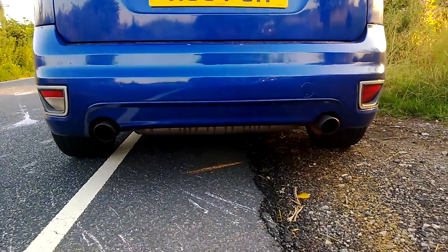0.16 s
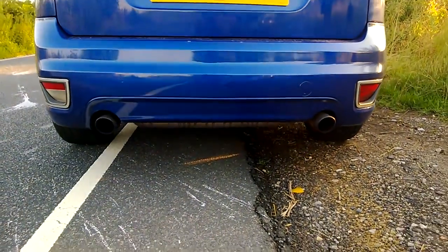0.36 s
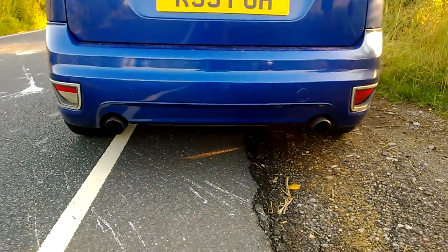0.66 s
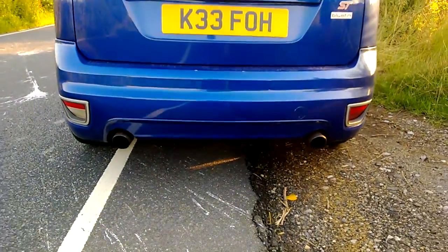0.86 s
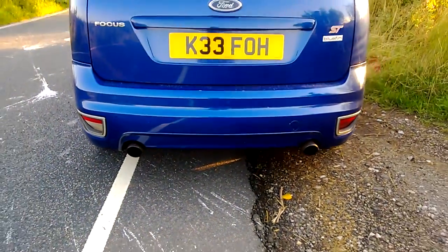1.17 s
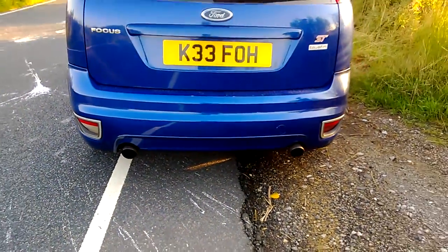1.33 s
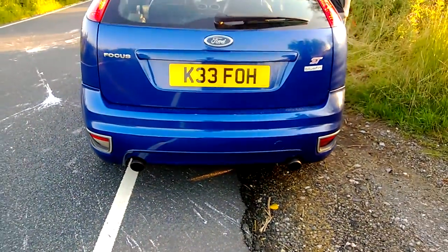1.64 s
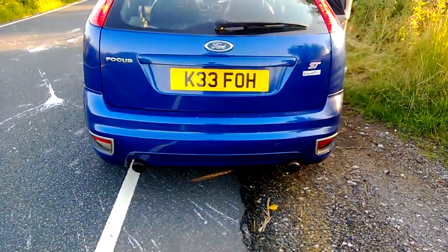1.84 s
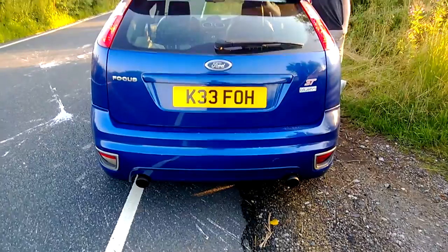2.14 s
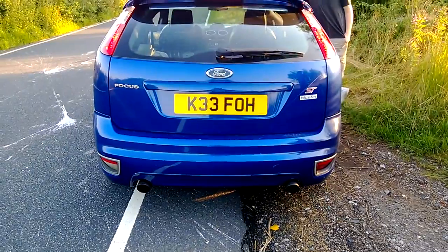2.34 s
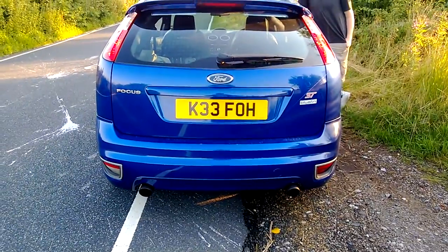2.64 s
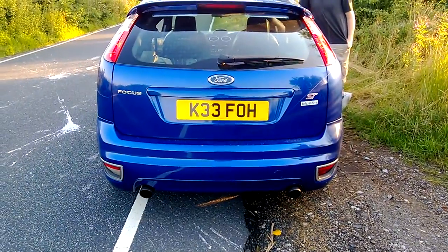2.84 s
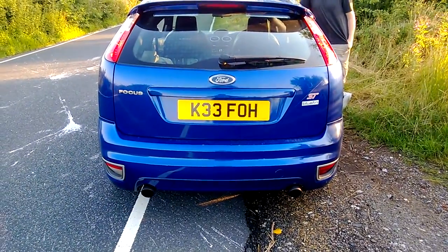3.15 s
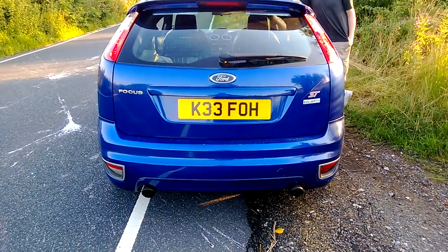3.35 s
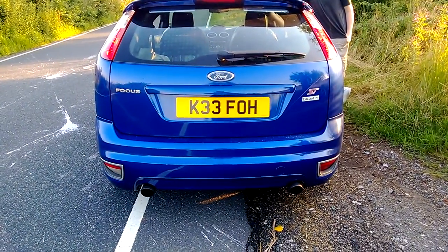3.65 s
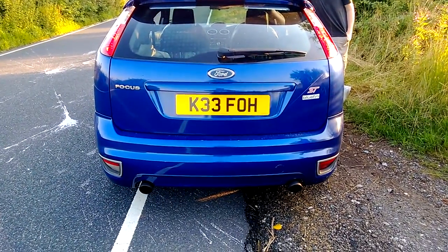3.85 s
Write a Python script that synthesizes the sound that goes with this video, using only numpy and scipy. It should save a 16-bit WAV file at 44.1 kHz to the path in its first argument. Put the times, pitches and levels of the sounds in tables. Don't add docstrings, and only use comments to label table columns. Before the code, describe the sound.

Close behind a car's tailpipes on an open roadside, the engine runs down with dense popping and hissing spits, the microphone backs away, idle settles softly, and a fresh rev rises at the end.

```python
import sys
import numpy as np
from scipy import signal
from scipy.fft import rfft, irfft
from scipy.io import wavfile
from scipy.ndimage import uniform_filter1d

SR = 44100
rng = np.random.default_rng(int(sys.argv[2]) if len(sys.argv) > 2 else 0)


def pcm_store(signal):
    levels = np.round(np.clip(np.atleast_2d(signal), -1, 1) * 32767)
    wavfile.write(sys.argv[1], SR, levels.astype(np.int16).T)


def gain_from_db(level_db):
    decades = np.asarray(level_db, float) / 20
    return 10 ** decades


N = 176400
TIME = np.arange(N) / SR

# time in seconds, firing rate in Hz, level in dB, overtone gain in dB.
FIRING_NOTE = [(0, 173.5, -38, -4.5), (.22, 164.1, -25, -0.5), (.29, 161.4, -40, -3),
               (.35, 157.9, -40.5, -7), (.4, 155.4, -25.5, -9.5), (.89, 130.7, -30.5, -1.5),
               (1.3, 116.6, -41, -6.5), (2.4, 66.27, -40.5, -10), (2.68, 58, -33.5, -6.5),
               (2.94, 50.11, -27.5, -13.5), (3.25, 44.79, -42, -5.5), (3.55, 41.9, -44, -5),
               (3.745, 50.72, -23.5, -11.5), (3.83, 57.75, -19.5, -5), (3.92, 68.7, -21, 5),
               (4, 69.2, -21, 5.5)]
# frequency in Hz, level in dB.
OVERTONES = [(85, -23.5), (138, -14), (200, -35), (270, -23), (330, -38), (400, -42.5), (510, -32),
             (700, -68)]
# multiple of a fifth of the firing rate, level in dB.
FIFTHS = [(2, -3.5), (4, -15.5), (8, -16), (12, -24.5), (14, -16.5), (15, -15), (22, -19), (30, -14)]
IMBALANCE_HZ, IMBALANCE_DB_PER_OCT, FIFTHS_FOLLOW = 174, 13.5, 0.2
FUEL_CUT_S, FUEL_CUT_DB = 0.39, -14.5

# start in seconds, length in
# seconds, level in dB, pitch in Hz.
BOOMS = [(0.223, 0.1, -24, 61.7), (0.37, 0.068, -24, 48.5), (0.473, 0.034, -27.5, 47),
         (0.527, 0.054, -22.5, 65), (0.595, 0.014, -19.5, 47), (0.619, 0.15, -21.5, 62.84),
         (0.796, 0.13, -22.5, 60.3), (0.951, 0.041, -37.5, 71), (0.974, 0.048, -28, 67),
         (1.042, 0.051, -25.5, 70.6), (1.137, 0.061, -30, 50.7), (1.205, 0.074, -29.5, 48.2),
         (1.305, 0.12, -27, 55.1), (1.527, 0.13, -24.5, 54), (1.677, 0.12, -25, 50.7),
         (1.752, 0.056, -18.5, 51), (1.883, 0.018, -20.5, 55.9), (1.939, 0.073, -25.5, 56.7),
         (1.989, 0.02, -17, 49.7), (2.064, 0.048, -22, 56.6), (2.14, 0.25, -23, 54.5),
         (2.427, 0.089, -24.5, 62.9), (2.555, 0.097, -28.5, 52.6),
         (1.399, 0.11, -19.5, 56.8),
    (3.362, 0.067, -45, 40.8),
    (3.46, 0.058, -42, 39.3),
]
BOOM_EDGE_S, BOOM_WOBBLE, BOOM_LUMPS_DB = 0.019, 0.041, 3.5

# time in seconds, uneven burning in dB, rasp in dB, jet hiss in dB.
GAS_FLOW = [(0, -41.5, -41.5, -61), (.08, -53.5, -42.5, -60.5), (.2, -44.5, -41.5, -62),
            (.3, -47, -48.5, -62.5), (.43, -40.5, -42, -64), (.6, -41.5, -42.5, -63.5),
            (1, -41.5, -47.5, -69), (1.2, -49.5, -48.5, -69.5), (1.45, -50.5, -48, -73.5),
            (1.7, -45.5, -52, -81.5), (1.9, -48, -51.5, -86.5), (2.25, -49, -57.5, -87.5),
            (2.55, -49, -61.5, -94.5), (2.75, -59, -70, -98), (3.5, -83, -83.5, -99),
            (3.75, -59, -55.5, -86), (3.92, -47, -46, -75), (4, -54, -44, -68.5)]
GATE, UNEVEN_DB = 0.28, 1.5
CREST_DB, STEEPEN = 1.5, 0.15
REV_S, REV_DIP_DB, TIP_REV_DB = 3.6, -5.5, 0.5
KNOCK_STEADY, KNOCK_BURST_DB = 0.9, 27
# middle in seconds, half length in seconds, gain in dB.
GUSTS = [(0.492, .015, -2), (0.602, .015, 0), (0.722, .02, 2.5), (.885, .015, 4), (1.068, .02, 2.5),
         (1.323, .015, 7.5), (1.465, .018, 6.5), (1.547, .03, 5), (1.61, .018, 9), (1.716, .02, 11),
         (1.77, .025, 9), (1.87, .035, 4), (2.09, .018, 8), (2.193, .015, 9), (2.255, .03, 11.5),
         (2.57, .012, 7), (2.61, 0.023, 14.5), (3.85, .03, 7.5), (3.938, .025, 9.5)]
# frequency in Hz, level in dB per Hz.
JET_COLOUR = [(4000, -13), (4800, -4), (6000, -6.5), (8500, -3.5), (9800, -6), (11000, -3.5), (13000, -12),
              (15700, -19)]
JET_TOP_HZ, JET_TOP_FOLLOWS = 9800, 1

# time in seconds, peak in dB, bright part in dB, T60 in seconds.
POPS = [(0.363, -31.5, -20, 0.2), (0.397, -28, -20, 0.38), (0.486, -23.5, -10.5, 0.15),
        (0.592, -22, -11, 0.073), (0.653, -21, -46, 0.074), (0.714, -23, -57, 0.4), (0.861, -42.5, -6, 0.2),
        (0.893, -22.5, -60, 0.054), (0.934, -26, -43, 0.12), (0.997, -20, -22.5, 0.022),
        (1.047, -33, -24, 0.45), (1.137, -24.5, -50, 0.11), (1.205, -24.5, -39, 0.13),
        (1.313, -22, -26, 0.15), (1.406, -30, -20, 0.16), (1.461, -24, -21.5, 0.091),
        (1.589, -29, -22.5, 0.22), (1.706, -31.5, -22, 0.18), (1.792, -36, -51, 0.15),
        (1.946, -34, -42, 0.18), (2.068, -29.5, -64, 0.11), (2.14, -37.5, -42, 0.24),
        (2.225, -34.5, -27.5, 0.14), (2.366, -34, -43, 0.29), (2.555, -35, -29, 0.27),
        (3.916, -32, -24.5, 0.14)]
POP_SOFT_HZ, POP_SNAP_DB, POP_THUD_DB, POP_BRIGHT_SHARE = 2500, 4.5, 18.5, 0.39
# time in seconds, peak in dB.
CRACKLES = [(0.524, -28), (0.641, -28.5), (0.7, -22), (0.795, -35), (0.863, -30), (0.948, -23),
            (0.973, -29), (1.007, -35), (1.055, -34), (1.074, -25), (1.119, -25.5), (1.189, -31),
            (1.224, -41), (1.259, -37), (1.348, -34), (1.385, -34), (1.443, -19.5), (1.544, -36),
            (1.572, -42.5), (1.684, -28.5), (1.749, -28), (1.769, -30.5), (1.864, -36), (1.954, -36.5),
            (1.979, -41.5), (2.183, -34.5), (2.269, -39.5), (2.389, -40.5), (2.505, -39.5), (2.616, -47)]
CRACKLE_T60_S, CRACKLE_SNAP_DB, CRACKLE_BODY_DB = 0.055, 0.5, -15.5

# frequency in Hz, width in Hz, level in dB.
PIPE_THUD = [(58, 17, -2.5), (103.2, 18.7, 3.5), (146.1, 20.8, 8), (259.5, 16, 3.5), (358.3, 19.6, 4),
             (387.8, 33.5, -0.5), (472, 32.7, -4.5)]
# frequency in Hz, width in Hz, level near in dB, gain further away in dB.
PIPE_KNOCK = [(101.5, 12, 10, 4.5), (143.3, 18.9, 16, -1.5), (257.1, 18, 5.5, 4), (360.2, 15.4, 4, 5),
              (391, 22.8, 9.5, -13), (479.3, 35, -3.5, -5)]
# frequency in Hz, width in Hz, level near in dB, gain further away in dB.
TAILPIPE = [(586, 99, -16.5, 4), (734.1, 13.5, 1, -2.5), (873, 53, -19, 17.5), (959, 86.5, 2.5, -3.5),
            (1149, 143, -10, 1), (1289, 207, -3.5, -12), (1480, 120, -11.5, -5), (1812, 107, -15, 9),
            (2088, 130, -16.5, 0.5)]
# frequency in Hz, width in Hz, level near in dB, gain further away in dB.
TIP = [(3030, 296, -0.5, 7), (3337, 179, 3, -2.5), (3580, 327, 4, 1.5), (3834, 367, 5, -11.5),
       (4020, 280, -20.5, 11)]
TIP_DB = -18
# frequency in Hz, width in Hz, level in dB.
REV_RINGS = [(1710, 240, 5), (2317, 130, 1)]
# frequency in Hz, width in Hz, level in dB.
MAIN_CHAMBER = [(976, 51, 2), (1017, 88, -5.5)]
CHAMBER_DB, CHAMBER_SMALL_DB, CHAMBER_SOFT_S = 13.5, 4, 0.001
STEP_BACK_S, STEP_TAKES_S, PATCHY_DB = 1.153, 0.27, 2.0

TICK_S, TICK_SPREAD_S, TICK_PERIOD_S = 3.43, 0.09, 0.0245
TICK_HZ, TICK_SAG_HZ_PER_S, TICK_DB = 3610, 600, -74
END_CLICK_S, END_CLICK_DB = 3.9997, -27
# start in seconds, length in seconds, start pitch in Hz, end pitch in Hz, level in dB.
SQUEAKS = [
    (3.292, 0.071, 2450, 2570, -72),
    (3.31, 0.065, 2740, 2800, -80),
    (3.342, 0.07, 2270, 2500, -74),
]
# frequency in Hz, level in dB per Hz.
AIR_COLOUR = [(40, -4.5), (60, 1.5), (142, -10.5), (230, -25), (570, -33), (950, -28.5), (2300, -42.5),
              (5000, -62), (16000, -78)]
AIR_DB = -52


def rms_one(x):
    return x / np.sqrt(np.mean(x ** 2) + 1e-20)


def in_time(rows):
    s, *columns = np.transpose(rows)
    return [np.interp(TIME, s, c) for c in columns]


def drift(rate_hz):
    r = np.exp(-80 * np.pi * rate_hz / SR)
    chance = rng.standard_normal(N // 40 + 2002)
    slow = signal.lfilter([1], [1, -2 * r, r * r], chance)[2000:]
    return np.interp(np.arange(N) / 40, np.arange(len(slow)), rms_one(slow))


def coloured(spectrum):
    hz, db = np.transpose(spectrum)
    log_hz = np.log(np.arange(N // 2 + 1) * SR / N + 1)
    gain = gain_from_db(np.interp(log_hz, np.log(hz), db, left=-99, right=-99))
    return rms_one(irfft(rfft(rng.standard_normal(N)) * gain, N))


def resonate(x, table):
    out = 0
    for k, (hz, width_hz, db) in enumerate(table):
        r = np.exp(-np.pi * width_hz / SR)
        top = [(1 - r * r) / 2, 0, (r * r - 1) / 2]
        bottom = [1, -2 * r * np.cos(2 * np.pi * hz / SR), r * r]
        out = out + (-1) ** k * gain_from_db(db) * signal.lfilter(top, bottom, x + 1e-18)
    return out


def chambers(x, table, patchy_db):
    away = 0.5 + 0.5 * np.tanh((TIME - STEP_BACK_S) / STEP_TAKES_S)
    out = 0
    for hz, width_hz, db, far_db in table:
        gain = gain_from_db(db + far_db * away + patchy_db * drift(5.8))
        once = resonate(x, [(hz, width_hz, 0)])
        out = out + gain * resonate(once, [(hz, 2 * width_hz, 0)])
    return out


def dying(s, db, t60):
    clicks, envelope, t = np.zeros(N), np.zeros(N), np.arange(SR // 3) / SR
    starts = (s * SR).astype(int)
    clicks[starts] = gain_from_db(db)
    for start, gain, decay in zip(starts, gain_from_db(db), np.clip(t60, 0.02, 0.4)):
        fall = gain * gain_from_db(-60 * (t / decay) ** 1.11)
        envelope[start:start + len(t)] += fall[:N - start]
    return clicks, envelope


def firing_note(turns, hz, level_db, over_db):
    tone = np.cos(2 * np.pi * turns)
    for k in range(2, 7):
        passed_db = np.interp(k * hz, *np.transpose(OVERTONES))
        tone += gain_from_db(passed_db + over_db) * np.cos(2 * np.pi * k * turns)
    fifths = sum(gain_from_db(db) * np.sin(2 * np.pi * k * turns / 5 + k) for k, db in FIFTHS)
    revs_db = -29.5 + IMBALANCE_DB_PER_OCT * np.log2(hz / IMBALANCE_HZ)
    cut_db = FUEL_CUT_DB * np.clip((TIME - FUEL_CUT_S) / 0.033, 0, 1)
    fifths_db = revs_db + FIFTHS_FOLLOW * (level_db + 24.5) + cut_db
    return np.sqrt(2) * gain_from_db(level_db + drift(47)) * tone + gain_from_db(fifths_db) * fifths


def booms():
    out = np.zeros(N)
    wobble, lumps = np.cumsum(drift(19.5)) / SR, gain_from_db(BOOM_LUMPS_DB * drift(32.6))
    for s, length, db, hz in BOOMS:
        inside = np.minimum(TIME - s, s + length - TIME)
        shape = np.sin(np.pi / 2 * np.clip(inside / BOOM_EDGE_S / 2 + 0.5, 0, 1)) ** 2
        swing = 2 * np.pi * (hz * (TIME - s + BOOM_WOBBLE * wobble) + rng.random())
        out += np.sqrt(2) * gain_from_db(db) * shape * (np.cos(swing) + 0.14 * np.cos(2 * swing))
    return out * lumps


def gas_puffs(turns, column):
    count = turns.astype(int)
    kick, strength = rng.standard_normal((2, count[-1] + 1))
    fired = np.diff(count, prepend=0) * kick[count]
    swing_rms = np.sqrt(uniform_filter1d(column ** 2, size=3000) + 1e-7)
    crest = rms_one(gain_from_db(CREST_DB * column / swing_rms))
    gate = 3 * np.exp(-3 * (turns % 1)) * gain_from_db(UNEVEN_DB * strength[count])
    return fired, crest, rms_one(crest * (1 - GATE + GATE * gate))


def pop_thud(snap, tick):
    push = signal.lfilter([0.01], [1, -1.8, 0.81], snap)
    thud = 40 * gain_from_db(POP_THUD_DB) * resonate(push, PIPE_THUD)
    soft = np.exp(-1 / (CHAMBER_SOFT_S * SR))
    ring = resonate(snap + gain_from_db(CHAMBER_SMALL_DB - 5.5) * tick, MAIN_CHAMBER)
    return thud + 400 * gain_from_db(CHAMBER_DB) * signal.lfilter([1 - soft], [1, -soft], ring)


def jet_hiss(jet_db, puff, flash):
    jet_db = jet_db + sum(db * np.exp(-((TIME - mid) / half) ** 2) for mid, half, db in GUSTS)
    flow = gain_from_db(jet_db + 0.89 * drift(24)) * puff ** 0.5
    hiss = coloured(JET_COLOUR) * (flow + gain_from_db(-17) * flash)
    top = signal.sosfiltfilt(signal.butter(4, JET_TOP_HZ, "high", fs=SR, output="sos"), hiss)
    return hiss - top + top * gain_from_db(JET_TOP_FOLLOWS * (jet_db - jet_db[0]))


def exhaust(turns, column):
    burn_db, rasp_db, jet_db = in_time(GAS_FLOW)
    load = TIME > REV_S
    fired, crest, puff = gas_puffs(turns, column)
    rasp_noise, tip_noise, pop_noise = rng.standard_normal((3, N))

    s, db, bright_db, t60 = np.transpose(POPS)
    snap, burst = dying(s, db - 12, t60)
    flash = dying(s, db + bright_db - 8.5, POP_BRIGHT_SHARE * t60)[1]
    small_s, small_db = np.transpose(CRACKLES)
    tick, spit = dying(small_s, small_db + CRACKLE_BODY_DB, np.full_like(small_s, CRACKLE_T60_S))
    clicks = 9 * gain_from_db(POP_SNAP_DB) * (snap + gain_from_db(CRACKLE_SNAP_DB) * tick)
    pops = chambers((burst * crest ** 0.5 + spit) * pop_noise + clicks, TAILPIPE, 0.73)

    knock = rms_one(chambers(fired + 0.04 * rng.standard_normal(N), PIPE_KNOCK, 1.56))
    knock = knock * (KNOCK_STEADY + gain_from_db(KNOCK_BURST_DB) * uniform_filter1d(burst + spit, size=400))
    gas = gain_from_db(rasp_db + REV_DIP_DB * load) * puff * rasp_noise
    rasp = 12 * (chambers(gas, TAILPIPE, PATCHY_DB) + pops)
    rasp = signal.sosfilt(signal.butter(4, POP_SOFT_HZ, fs=SR, output="sos"), rasp)
    tip_level = gain_from_db(rasp_db + TIP_DB + TIP_REV_DB * load) * puff ** 0.5 + flash
    tip = 5 * chambers(tip_noise * tip_level, TIP, 1.97)
    lean = resonate(resonate(gain_from_db(rasp_db) * load * puff * pop_noise, REV_RINGS), REV_RINGS)
    pipe = gain_from_db(burn_db + 10.0) * knock + rasp + tip + lean
    return pipe + jet_hiss(jet_db, puff, flash) + pop_thud(snap, tick)


def valve_ticks():
    t = TIME - TICK_S
    beat = (0.5 + 0.5 * np.cos(2 * np.pi * (t - 0.014) / TICK_PERIOD_S)) ** 2
    beat = beat * np.exp(-(t / TICK_SPREAD_S) ** 2)
    phase = 2 * np.pi * (TICK_HZ * t - TICK_SAG_HZ_PER_S * t ** 2 / 2) + 1.2 * drift(90)
    return gain_from_db(TICK_DB + 2.5 * drift(30)) * beat * np.sin(phase)


def mount_squeaks():
    out = np.zeros(N)
    for s, length, hz, end_hz, db in SQUEAKS:
        u = np.clip((TIME - s) / length, 0, 1)
        phase = 2 * np.pi * length * (hz * u + (end_hz - hz) * u ** 3 / 3) + 0.4 * drift(60)
        out += gain_from_db(db + 3.1 * drift(40)) * np.sin(np.pi * u) * np.sin(phase)
    return out


def roadside_air():
    return gain_from_db(AIR_DB) * coloured(AIR_COLOUR)


def scene():
    hz, level_db, over_db = in_time(FIRING_NOTE)
    turns = np.cumsum(hz) / SR
    column = firing_note(turns, hz, level_db, over_db) + booms()
    car = column + STEEPEN * column ** 2 + exhaust(turns, column)
    car += valve_ticks() + mount_squeaks()
    car[int(END_CLICK_S * SR)] += gain_from_db(END_CLICK_DB)
    return (car + roadside_air())[None]


def band_limit(x):
    return signal.sosfilt(signal.butter(12, 15800, fs=SR, output="sos"), x)


def record(dry):
    mix = signal.sosfiltfilt(signal.butter(2, 32, "high", fs=SR, output="sos"), dry)
    return band_limit(mix)


dry = scene()
out = record(dry)
pcm_store(out)
```